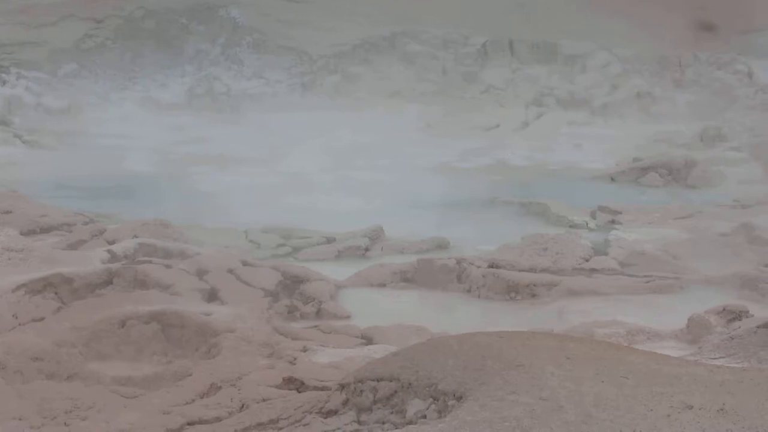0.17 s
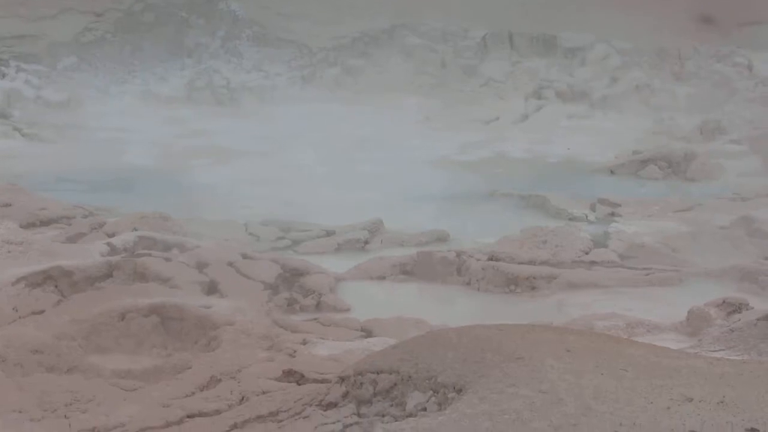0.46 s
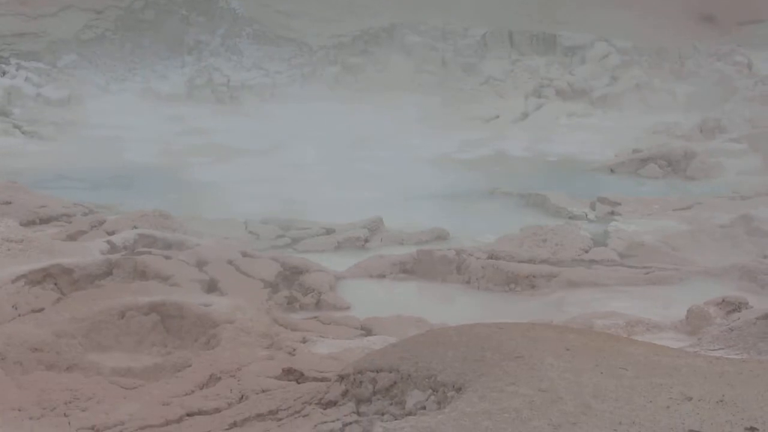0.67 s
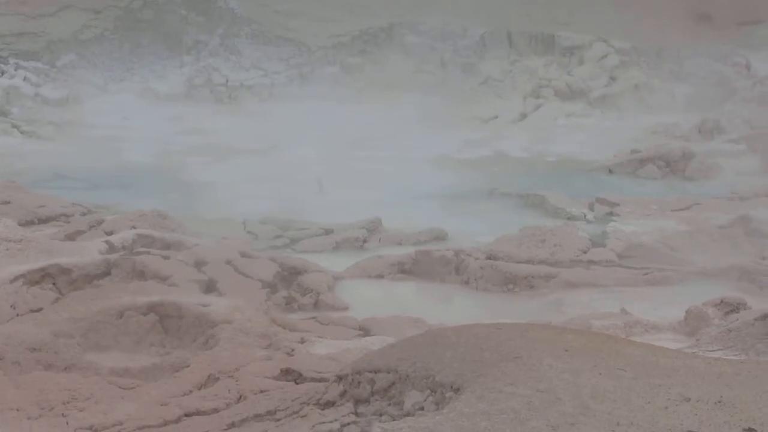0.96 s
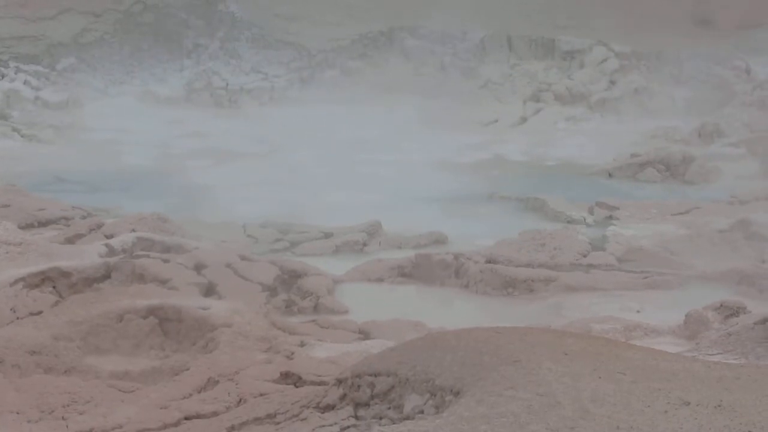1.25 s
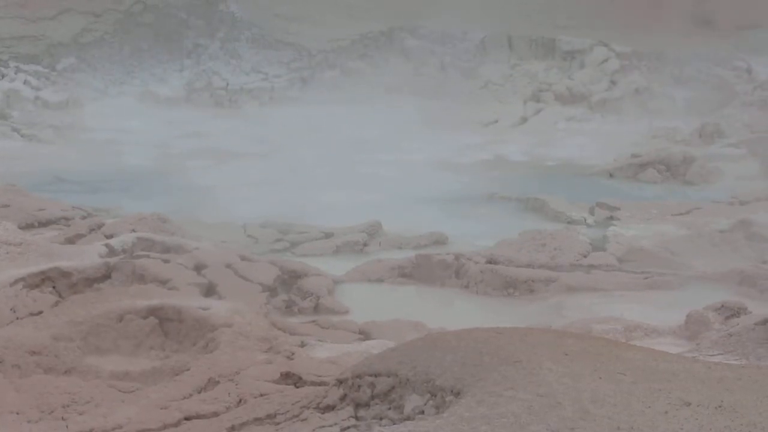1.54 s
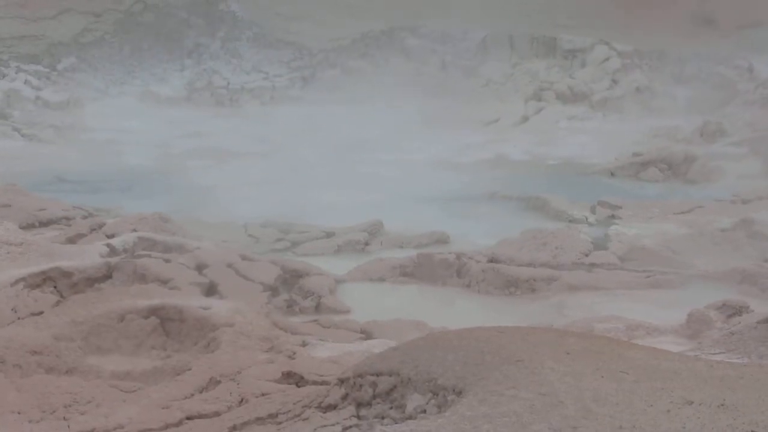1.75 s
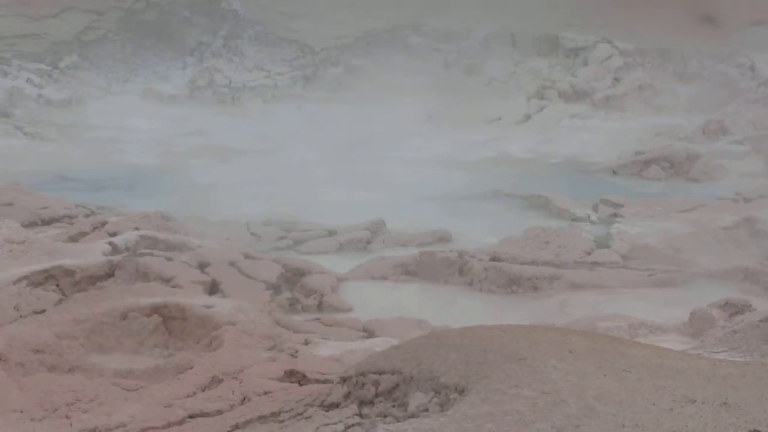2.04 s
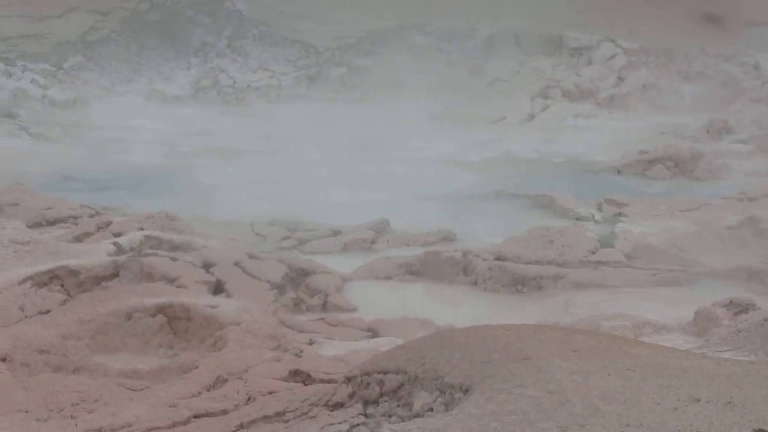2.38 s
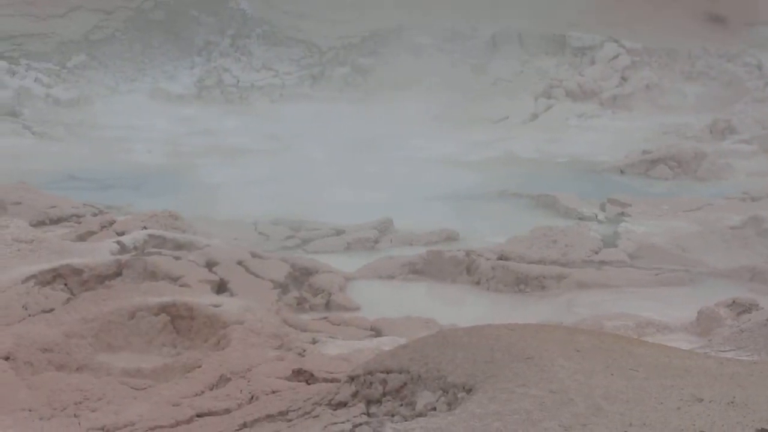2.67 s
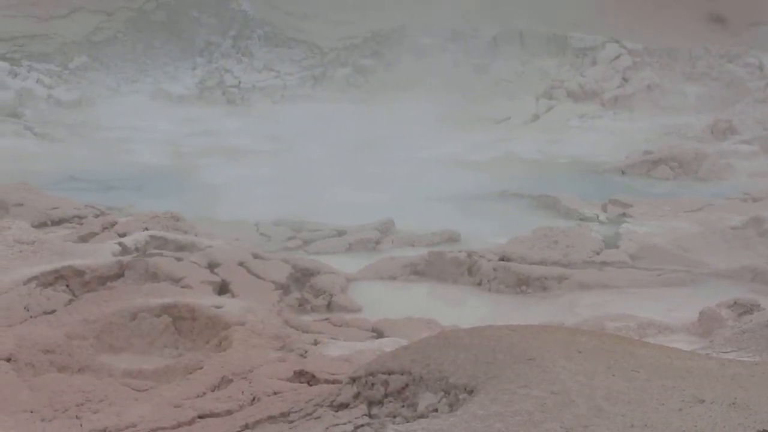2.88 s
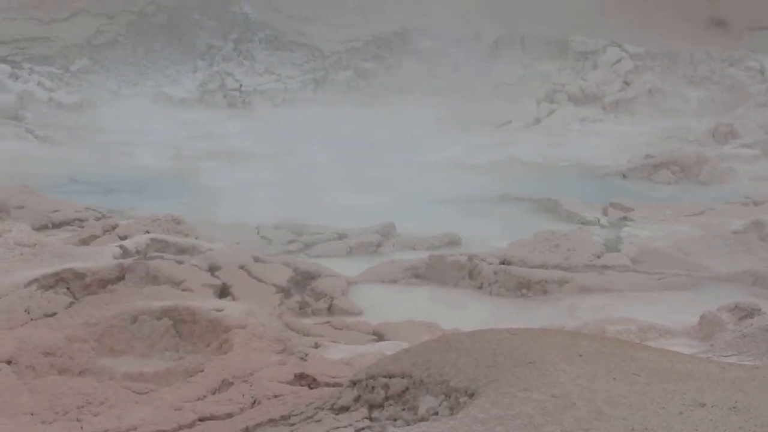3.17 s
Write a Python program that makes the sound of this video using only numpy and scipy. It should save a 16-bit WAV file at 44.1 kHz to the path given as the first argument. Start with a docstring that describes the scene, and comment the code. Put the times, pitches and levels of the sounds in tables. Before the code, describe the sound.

A hot spring boils outdoors a few metres away throughout: a dense wash of small bubbles over a low churning rumble, with faint fizzing spray. Deep gulps and short, clear pops come irregularly, standing out around 0.7 to 1 second, near 1.9 seconds and again from 2.4 to 3. The boil eases slightly toward the end at 3.3 seconds. A faint, low hum like a distant engine runs behind it.

```python
"""A hot spring boils in the open air, a few metres away.
Big bubbles gulp under the surface, countless small ones burst into a wash with a few clear pops,
and spray fizzes above it. Each gulp and pop is a short tone that rises in pitch.
A low hum, probably a distant engine, creeps up in pitch behind the pool."""
import sys
import numpy as np
from scipy import signal
from scipy.io import wavfile
from scipy.ndimage import uniform_filter1d

SR = 44100
rng = np.random.default_rng(int(sys.argv[2]) if len(sys.argv) > 2 else 0)


def to_wav(s):
    """Save 16-bit WAV."""
    ch = np.atleast_2d(s).T  # columns
    pcm = np.round(np.clip(ch, -1, 1) * 32767)  # PCM
    wavfile.write(sys.argv[1], SR, pcm.astype(np.int16))


N = 146412

# Stereo balance of the pool. Each row: frequency in Hz, left minus right in dB.
BALANCE = [(60, -0.5), (150, -2.2), (300, -0.5), (700, -4.5), (2000, -3.5), (4500, -1.5), (9000, -2),
           (13000, 17)]


def bubble_wash(vigour_db):
    """Countless small bubbles burst: a blur of noise and a swarm of nearer ones."""
    # Wash spectrum. Each row: frequency in Hz, relative level in dB.
    spectrum = [(420, -12), (540, 1), (700, -1.2), (880, 2), (1050, -1.5), (1280, -7.5), (1550, -5),
                (1900, -11.5), (2350, -12), (2900, -17), (3700, -25)]
    # Contour of the treble. Each row: time in seconds, relative level in dB.
    treble = [(0.15, -49.5), (0.51, -51.5), (2.3, -54.5), (3.08, -51), (3.3, -53.5)]
    # The boil shifts about the pool. Each row: time in seconds, left minus right in dB.
    pan = [(.2, 2.5), (1.0, 1), (1.45, 0.5), (1.85, -0.5), (2.3, 1.4), (3.2, 1.5)]
    treble_db = in_time(treble)
    treble_db = uniform_filter1d(treble_db - treble_db.mean(), size=8000)

    def swell_db(hz):
        vigour_share = at_hz([(1000, 1.35), (1600, 1.2), (2400, 0.23)], hz)
        treble_share = at_hz([(1300, 0), (2400, 0.85)], hz)
        return vigour_db * vigour_share + treble_db * treble_share

    blur = banded_noise(spectrum, 422.7, 3930, bands=14, shared_db=0.68, own_db=1.38, flutter_hz=19,
                        swell_db=swell_db)
    near = swarm(spectrum, 509, 2960, pitches=16, per_s=1000, cycles=7.4, size_db=3, spread_db=9)
    return (from_db(-36) * blur + from_db(-42.5 + 0.55 * vigour_db) * near) * panned(in_time(pan))


def pops():
    """Single bubbles burst: the film snaps, the bubble rings, water patters round it."""
    # Surface bursts. Each row: peak time in seconds, pitch in Hz, peak in dB, attack in seconds.
    bursts = [(0.1992, 1710, -27, 0.0013), (0.2859, 1530, -29, 0.00088), (0.2923, 1816, -30, 0.00087),
              (0.4568, 580, -24, 0.0019), (0.4728, 1100, -25.5, 0.0014), (.4793, 750, -22, .0017),
              (.538, 760, -25.5, 0.0016), (0.63, 2150, -35, .0015), (0.665, 1960, -31, .0018),
              (0.6996, 1536, -18.5, .0026), (0.9027, 880, -25.5, 0.0016), (0.9381, 830, -20.5, 0.00103),
              (.9511, 640, -21, 0.0025), (1.0284, 1820, -30, 0.00155), (1.098, 620, -24.5, 0.0027),
              (1.3339, 1560, -31, 0.0017), (1.394, 1380, -29, 0.0015), (1.4805, 680, -27.5, 0.0022),
              (1.5572, 880, -27, 0.0023), (1.6119, 750, -31, 0.0017), (1.8762, 1530, -28, 0.0012),
              (1.8864, 920, -19, 0.0018), (1.8875, 1400, -22.5, .0022), (1.9062, 970, -24.5, 0.002),
              (2.0978, 626, -24.5, 0.0023), (2.1508, 2500, -35, 0.0013), (2.2877, 2140, -24.5, .0015),
              (2.303, 1180, -28.5, 0.0029), (2.4125, 2000, -37, .002), (2.4258, 673, -21, 0.002),
              (2.43, 1590, -27, 0.0011), (2.4358, 886, -27.5, 0.0019), (2.4738, 1890, -32, .002),
              (2.578, 2130, -29, 0.0014), (2.599, 2180, -33, 0.0012), (2.6093, 2080, -32.5, .002),
              (2.6158, 1990, -29, 0.00082), (2.6916, 1960, -34.5, .002), (2.8232, 1780, -31, .0028),
              (2.8311, 2170, -31, .0014), (2.8345, 970, -26, 0.0023), (2.852, 900, -26, 0.0019),
              (2.925, 1950, -32, .0016), (2.97, 1450, -32.5, 0.0022), (3.2052, 1630, -30, 0.0013)]
    # Higher bubble modes. Each row: multiple of the pitch, level in dB re the peak.
    modes = [(2.4, -24), (3.3, -32)]
    rise = 0.027
    patter = splashes(bursts, gain_db=-22, half_s=0.01, ratio=0.98, half_octaves=0.6)
    snap = splashes(bursts, gain_db=-20, half_s=0.0007, ratio=1.7, half_octaves=0.19)
    overtones = 0
    for multiple, mode_db in modes:
        rows = [(peak_s, hz * multiple, db + mode_db, attack_s) for peak_s, hz, db, attack_s in bursts]
        overtones += bubbles(rows, rise)
    lowpass = signal.butter(4, 6400, fs=SR, output="sos")
    return (bubbles(bursts, rise) + signal.sosfilt(lowpass, patter + snap + overtones)) * panned(3)


def gulps():
    """Large bubbles ring under the surface and shove water aside."""
    # Large bubbles. Each row: peak time in seconds, pitch in Hz, peak in dB, attack in seconds.
    rows = [(.238, 239, -26, .012), (.440, 262, -27.5, 0.0062), (.666, 330, -29.5, .012),
            (.765, 158, -32, .014), (.906, 180, -22, 0.0049), (.923, 240, -23.5, .012),
            (.9425, 337, -28.5, 0.0077), (.9934, 287, -28.5, 0.0091), (1.009, 188, -29.5, 0.013),
            (1.213, 141, -29, 0.011), (1.364, 249, -23.5, .018), (1.616, 175.5, -29, .02),
            (1.787, 151, -27, .022), (1.858, 190, -28.5, 0.013), (1.891, 164, -27.5, .012),
            (2.014, 137, -33, 0.02), (2.564, 197, -28.5, 0.014), (2.628, 161, -29, 0.017),
            (2.757, 192, -26.5, 0.015), (2.854, 257, -29.5, 0.0096), (2.894, 225, -23.5, 0.0077),
            (2.982, 132, -25.5, 0.019)]
    tones = bubbles(rows, rise=0.058)
    slosh = splashes(rows, gain_db=-15, half_s=0.013, ratio=1.07, half_octaves=0.99)
    return (tones + slosh) * panned(-0.9)


def churning(vigour_db):
    """The pool churns with a deep rumble that partly follows the boil's vigour."""
    # Rumble spectrum. Each row: frequency in Hz, relative level in dB.
    spectrum = [(22, -36), (32, -28), (45, -17.5), (60, -5), (90, -1.5), (155, 2.26), (210, -1), (320, -6),
                (410, -12)]
    rumble = banded_noise(spectrum, 19.77, 407.5, bands=13, shared_db=1.35, own_db=0.5, flutter_hz=14.6)
    return from_db(-34.5 + 0.46 * vigour_db) * rumble


def spray():
    """Steam and fine spray fizz; a few droplets land with sharper ticks."""
    # Fizz spectrum. Each row: frequency in Hz, relative level in dB.
    spectrum = [(3800, -6.5), (5000, 2), (7600, -6), (10000, -15), (12300, -51), (15500, -27)]
    # Fizz contour. Each row: time in seconds, level in dB before gain.
    contour = [(.15, -57), (.55, -57.5), (.85, -60), (1.35, -58), (1.75, -60), (2.05, -60), (2.3, -57.5),
               (2.6, -59), (3.05, -60.5), (3.3, -62.5)]
    # Droplets landing. Each row: peak time in seconds, pitch in Hz, peak in dB, attack in seconds.
    ticks = [(.3277, 5340, -41, .0003), (.4694, 6900, -44, 0.00046), (.5244, 7200, -42, 0.00047),
             (.6655, 6850, -42, 0.00041), (.6753, 5900, -45, .0003), (.7463, 7850, -44, 0.00025),
             (1.3415, 7400, -40, 0.00024), (2.134, 5440, -47.5, .0018), (2.2741, 6100, -46, 0.00107),
             (2.2869, 4580, -33, 0.00022), (2.6955, 6760, -47, .0004), (3.0687, 5340, -41, 0.00042)]
    hiss = banded_noise(spectrum, 3980, 15060, bands=12, shared_db=1.0, own_db=1.73, flutter_hz=19)
    droplets = swarm(spectrum, 4600, 9400, pitches=10, per_s=500, cycles=5.8, size_db=5.5, spread_db=20)
    fizz = from_db(in_time(contour) + 1.5) * (hiss + from_db(-12) * droplets)
    return fizz + bubbles(ticks, rise=0.02) * panned(-6)


def engine(wander_rad=0.21):
    """Three low harmonics of a far engine waver in phase on their way through the air."""
    # Engine speed. Each row: time in seconds, firing rate in Hz.
    firing = [(0, 36.5), (1.0, 37), (2.0, 36.5), (3.3, 37.5)]
    # Hum lines. Each row: multiple of the firing rate, rms in dB before the contour.
    harmonics = [(2, -42.5), (3, -45.5), (4, -46.5)]
    # Hum contour. Each row: time in seconds, gain in dB.
    contour = [(0, -1), (1.2, 0.5), (2.0, -0.5), (3.3, -3.5)]
    firing_rad = 2 * np.pi * np.cumsum(in_time(firing)) / SR
    hum = 0
    for multiple, db in harmonics:
        phase_rad = multiple * firing_rad + wander_rad * drift(15) + 2 * np.pi * rng.random()
        hum += from_db(db) * np.sqrt(2) * np.sin(phase_rad)
    return from_db(in_time(contour)) * hum * panned(-0.6)


def whine(hz=15734, rms_db=-92):
    """A thin, steady electrical tone at the edge of hearing."""
    return from_db(rms_db) * np.sqrt(2) * np.sin(2 * np.pi * hz * np.arange(N) / SR)


def bubbles(rows, rise):
    """Each bubble rings, swelling fast and dying slower; log pitch climbs by `rise` per attack time."""
    out = np.zeros(N)
    for peak_s, hz, db, attack_s in rows:
        i = np.arange(max(int((peak_s - attack_s) * SR), 0), min(int((peak_s + 4 * attack_s) * SR), N))
        age = np.maximum((i / SR - peak_s) / attack_s + 1, 0)  # 1 at the peak
        envelope = (age * np.exp(1 - age)) ** 5
        pitch_hz = hz * np.exp(rise * (age - 1))
        phase_rad = 2 * np.pi * (np.cumsum(pitch_hz) / SR + rng.random())
        out[i] += from_db(db) * envelope * np.sin(phase_rad)
    return out


def splashes(rows, gain_db, half_s, ratio, half_octaves):
    """A soft noise burst round each bubble, centred on `ratio` times its pitch."""
    out, reach = np.zeros(N), int(0.06 * SR)
    for peak_s, hz, db, _ in rows:
        i = int(peak_s * SR) + np.arange(-reach, reach)
        edges_hz = np.clip(hz * ratio * 2 ** (half_octaves * np.array([-1, 1])), 20, 0.45 * SR)
        noise = rms_one(bandpass(rng.standard_normal(len(i)), edges_hz))
        envelope = np.exp(-((i / SR - peak_s) / half_s) ** 2)
        out[np.clip(i, 0, N - 1)] += from_db(db + gain_db) * envelope * noise
    return out


def swarm(spectrum, low_hz, high_hz, pitches, per_s, cycles, size_db, spread_db):
    """Small bubbles at random times, sizes and places, each ringing for a few cycles; rms 1."""
    out = np.zeros((2, N))
    for hz in np.geomspace(low_hz, high_hz, pitches):
        draws = rng.random((1500, 5))
        chance = per_s * N / SR / pitches / len(draws)
        when, _, size, sign, place = draws[draws[:, 1] < chance].T
        strength = np.sign(sign - 0.5) * from_db(size_db * np.minimum(-np.log(size), 4) + at_hz(spectrum, hz))
        pan_db = at_hz(BALANCE, hz) + spread_db * (2 * place - 1)
        clicks = np.zeros((2, N))
        clicks[:, (when * N).astype(int)] = strength * panned(pan_db)
        radius = np.exp(-np.log(1000) * hz / (cycles * SR))
        gain = (1 - radius ** 2) / 2
        resonator = [gain, 0, -gain, 1, -2 * radius * np.cos(2 * np.pi * hz / SR), radius ** 2]
        out += signal.sosfilt([resonator, resonator], clicks + 1e-18)
    return rms_one(out)


def banded_noise(spectrum, low_hz, high_hz, bands, shared_db, own_db, flutter_hz, swell_db=lambda hz: 0):
    """Stereo noise in bands that flutter together and on their own; rms 1."""
    # Likeness of the channels. Each row: frequency in Hz, correlation from -1 to 1.
    likeness = [(30, .92), (70, 0.76), (140, 1), (300, 0.68), (600, 0.7), (1000, 0.6), (2400, 0.5),
                (4000, 0.15), (9000, -0.21)]
    out, together = 0, drift(flutter_hz)
    edges_hz = np.geomspace(low_hz, high_hz, bands + 1)
    white = rng.standard_normal((2, 2, N))
    for k in range(bands):
        mid, side = bandpass(white[k % 2], edges_hz[k:k + 2])
        hz = np.sqrt(edges_hz[k] * edges_hz[k + 1])
        alike = at_hz(likeness, hz)
        stereo = np.sqrt(1 + alike) * mid + np.sqrt(1 - alike) * side * [[1], [-1]]
        flutter_db = shared_db * together + own_db * drift(flutter_hz)
        gain = from_db(at_hz(spectrum, hz) + swell_db(hz) + flutter_db)
        out += gain * panned(at_hz(BALANCE, hz)) * stereo
    return rms_one(out)


def drift(rate_hz):
    """Slow random motion; rms 1."""
    hop, settle = 40, 2000
    pole = np.exp(-2 * np.pi * hop * rate_hz / SR)
    white = rng.standard_normal(N // hop + settle + 2)
    slow = signal.lfilter([1], [1, -2 * pole, pole ** 2], white)[settle:]
    return np.interp(np.arange(N) / hop, np.arange(len(slow)), rms_one(slow))


def bandpass(x, edges_hz):
    return signal.sosfilt(signal.butter(2, edges_hz, "band", fs=SR, output="sos"), x)


def from_db(db):
    return 10 ** (np.asarray(db) / 20)


def rms_one(x):
    return x / np.sqrt(np.mean(x ** 2) + 1e-20)


def in_time(rows):
    """Read (seconds, value) rows at every sample."""
    return np.interp(np.arange(N) / SR, *np.transpose(rows))


def at_hz(rows, hz):
    """Read (Hz, value) rows on a log axis."""
    row_hz, values = np.transpose(rows)
    return np.interp(np.log(hz), np.log(row_hz), values)


def panned(pan_db):
    """Channel gains for left minus right in dB."""
    return from_db(np.array([[0.5], [-0.5]]) * pan_db)


def scene():
    """The pool in front, the hum behind."""
    # Vigour of the boil. Each row: time in seconds, relative level in dB.
    vigour = [(.15, 0), (.45, -1.2), (.7, -1.5), (1.1, -0.7), (1.5, 0), (1.85, 1), (2.2, -0.6), (2.6, -1.5),
              (3.0, -2.6), (3.3, -3.5)]
    vigour_db = in_time(vigour)
    return churning(vigour_db) + gulps() + bubble_wash(vigour_db) + pops() + spray() + engine()


def record(dry):
    """Add the whine, fade in after a brief silence, cut the top steeply."""
    start_s, fade_s, cutoff_hz = 0.12, 0.014, 15800
    fade_in = np.clip((np.arange(N) / SR - start_s) / fade_s, 0, 1)
    lowpass = signal.ellip(12, 0.1, 80, cutoff_hz, fs=SR, output="sos")
    return signal.sosfilt(lowpass, (dry + whine()) * fade_in)


dry = scene()
out = record(dry)
to_wav(out)
```